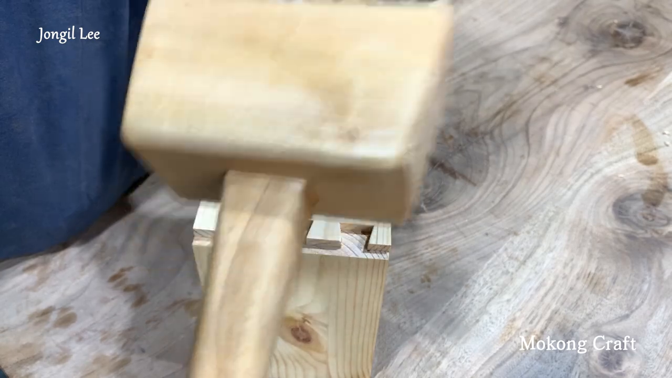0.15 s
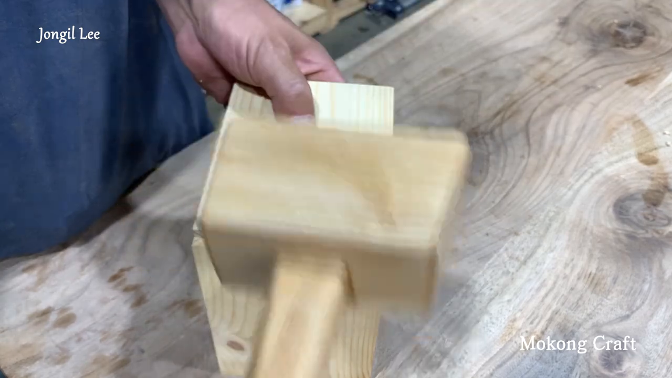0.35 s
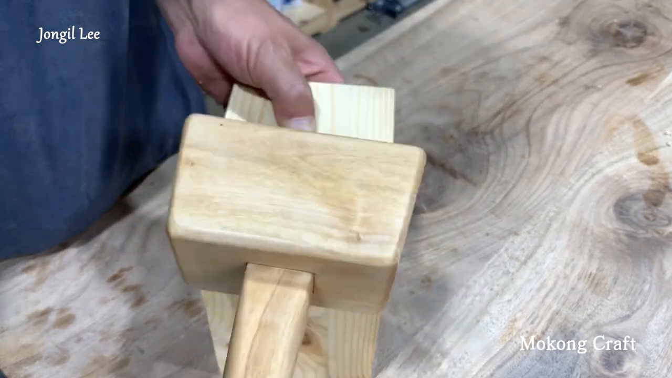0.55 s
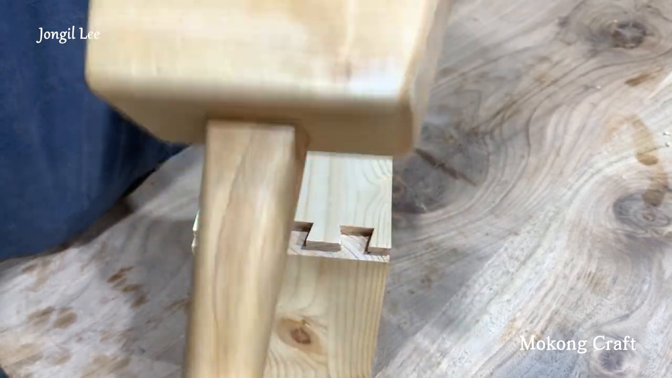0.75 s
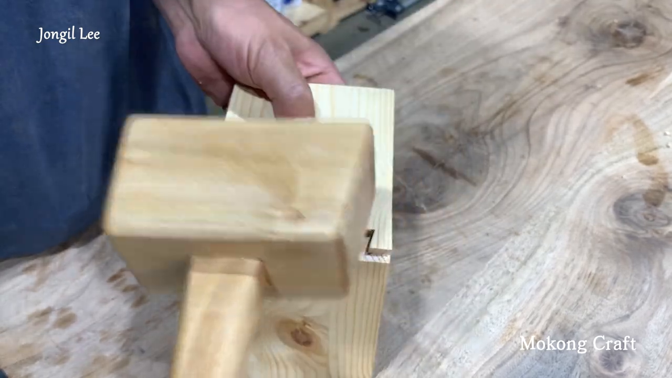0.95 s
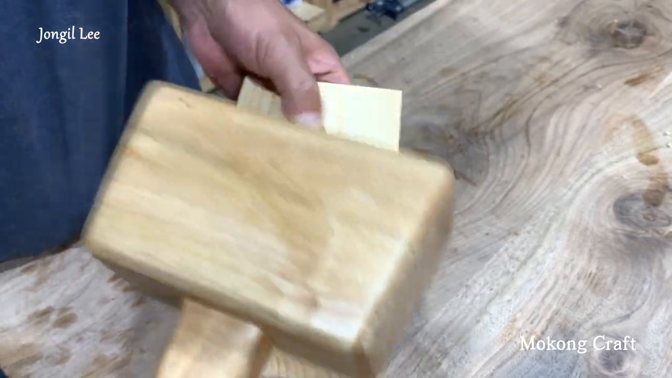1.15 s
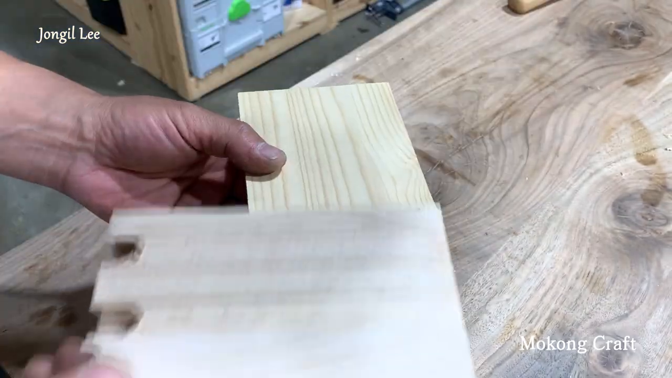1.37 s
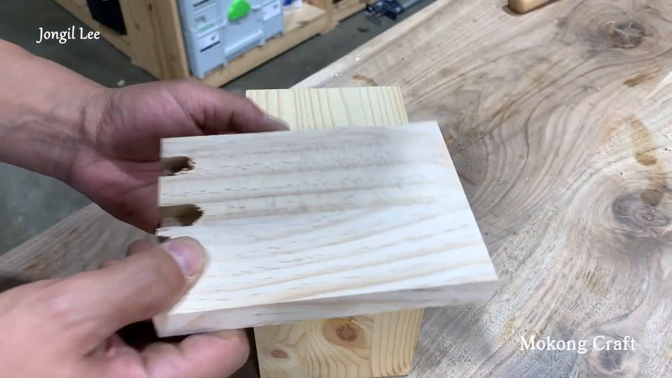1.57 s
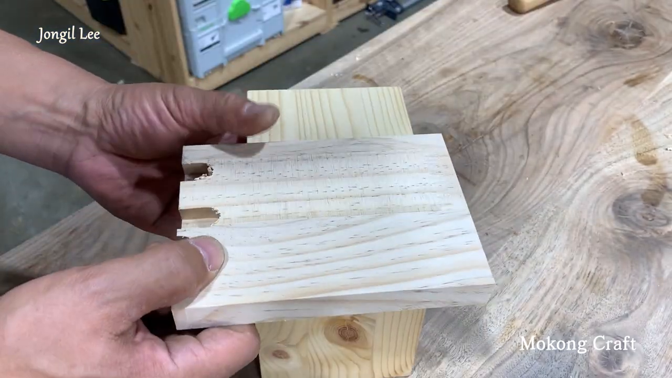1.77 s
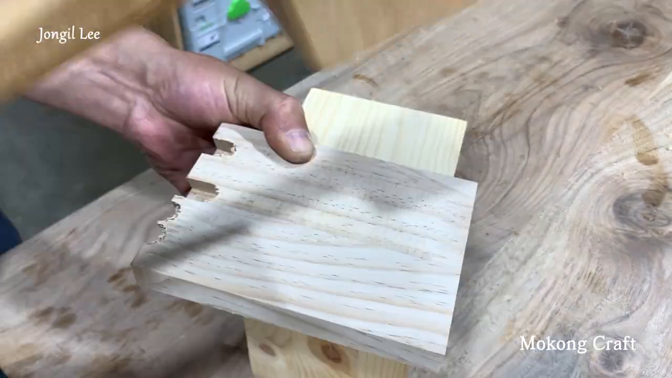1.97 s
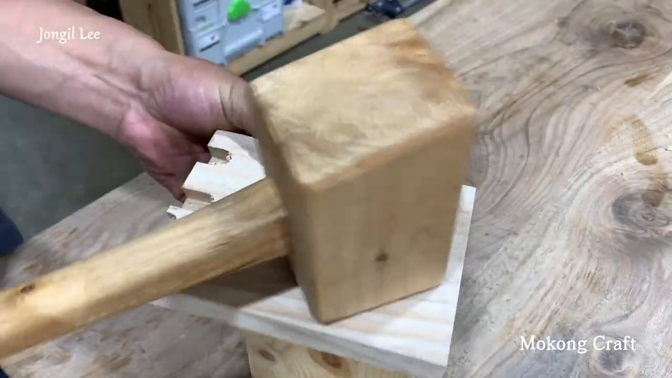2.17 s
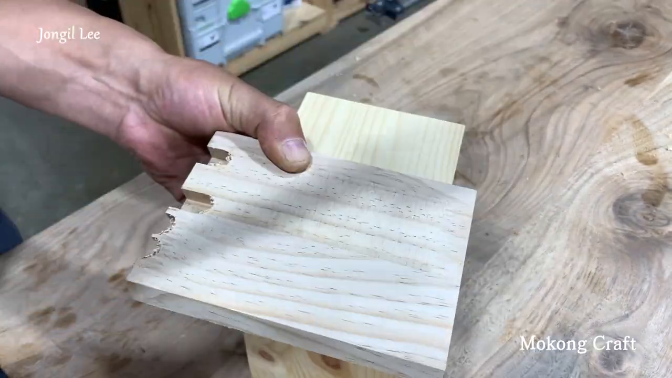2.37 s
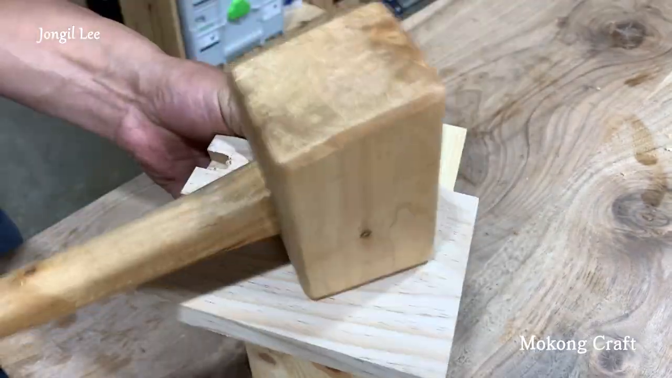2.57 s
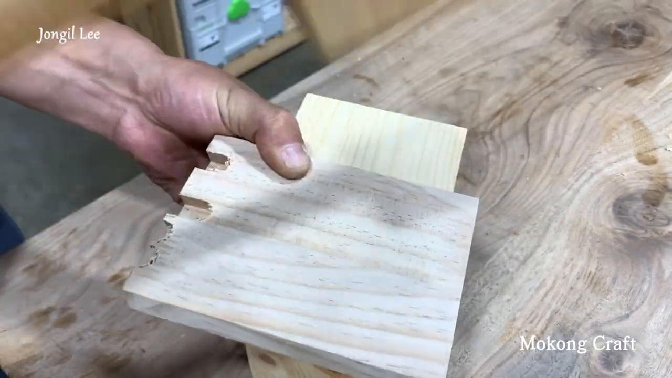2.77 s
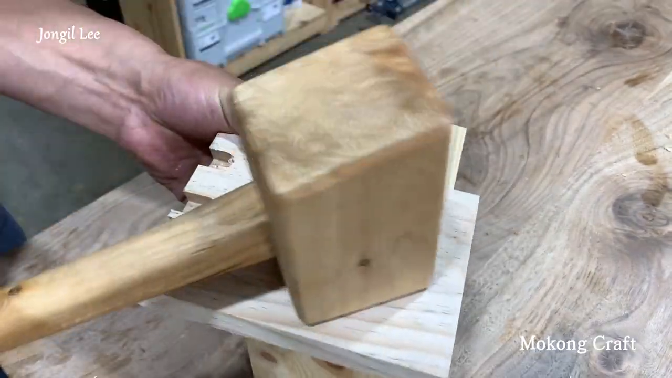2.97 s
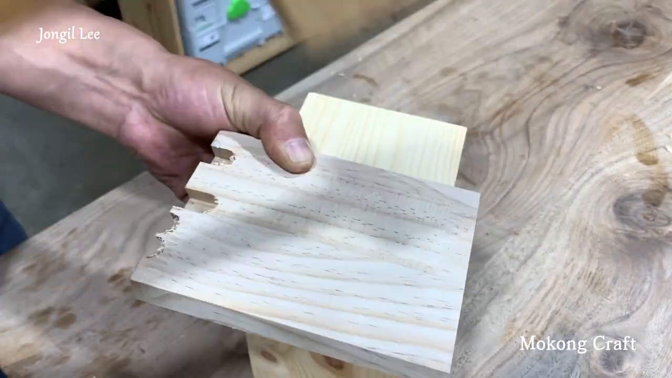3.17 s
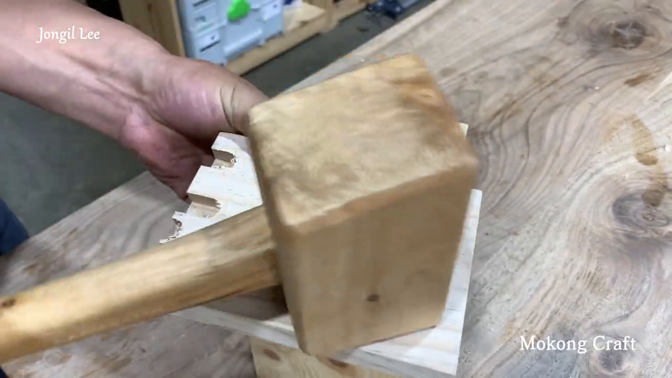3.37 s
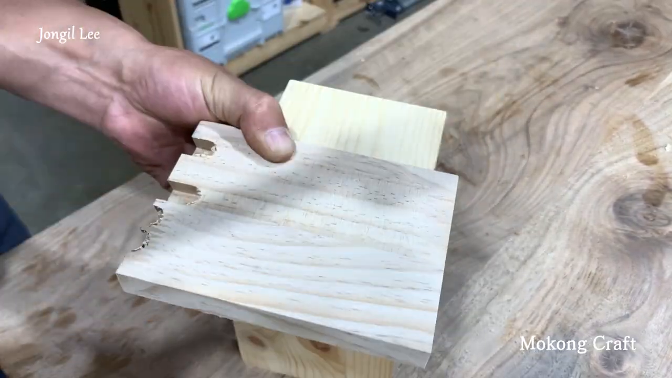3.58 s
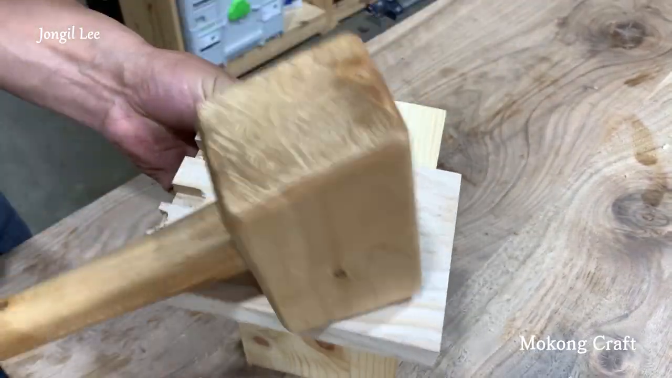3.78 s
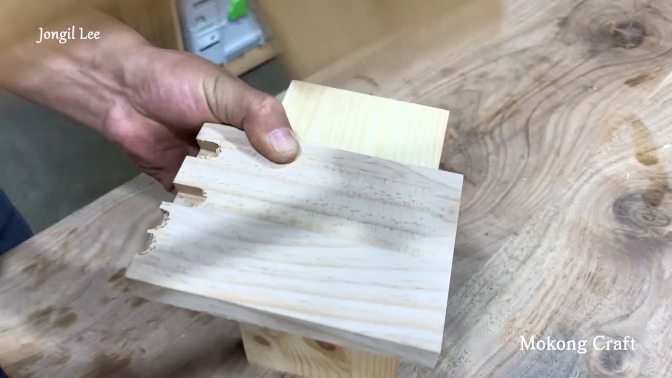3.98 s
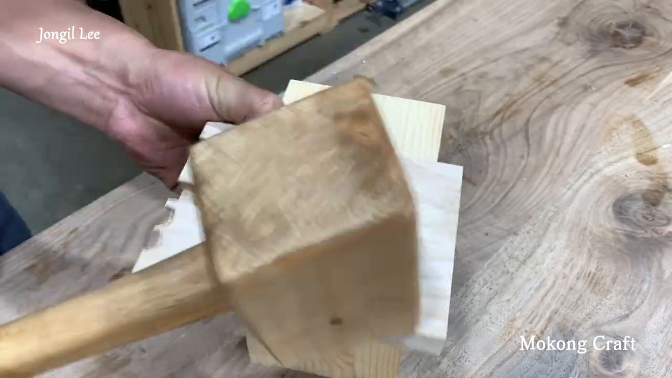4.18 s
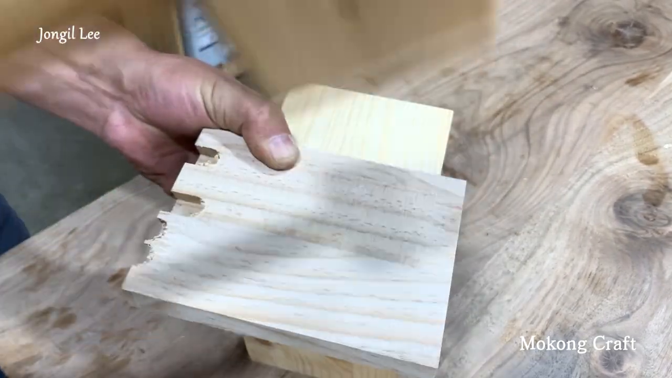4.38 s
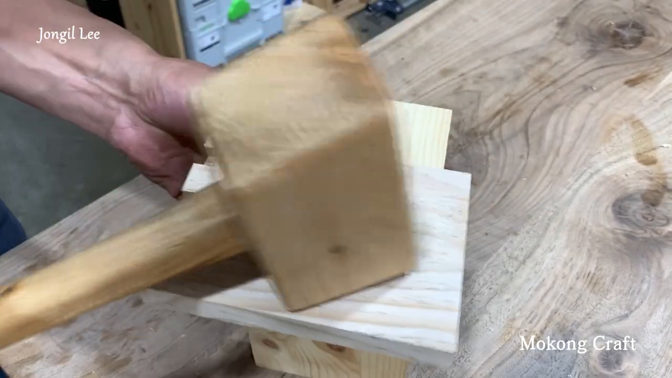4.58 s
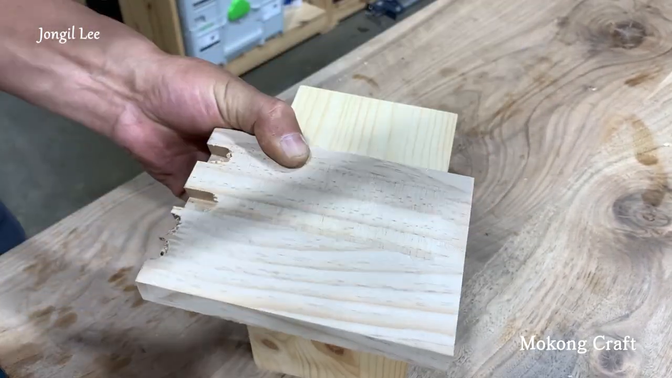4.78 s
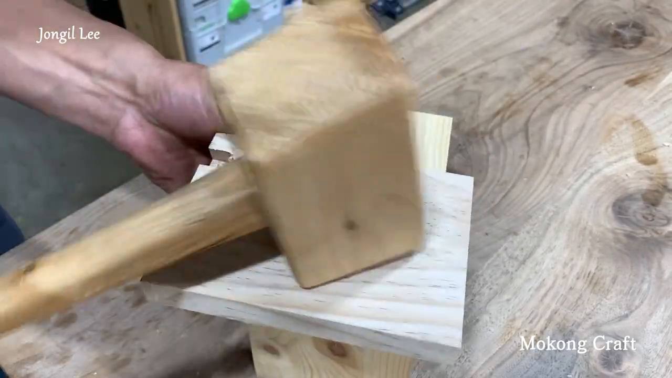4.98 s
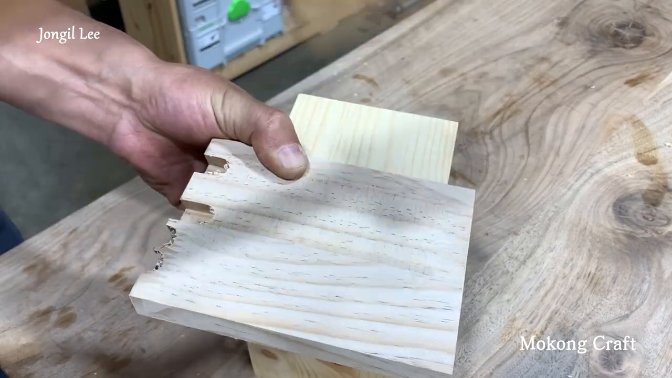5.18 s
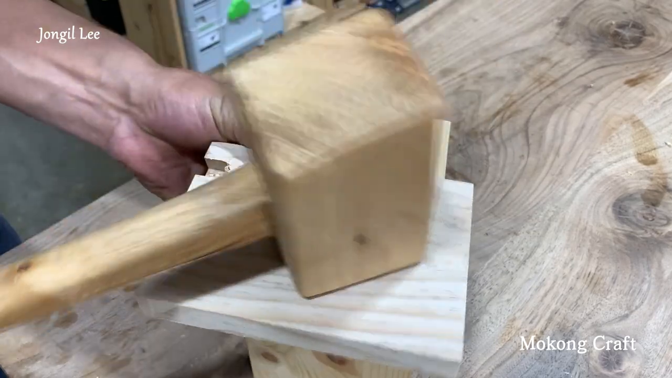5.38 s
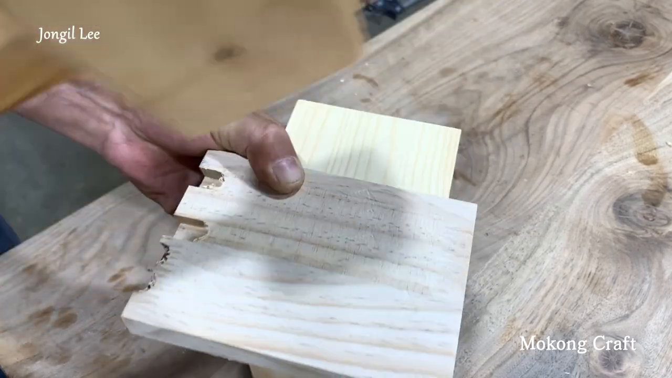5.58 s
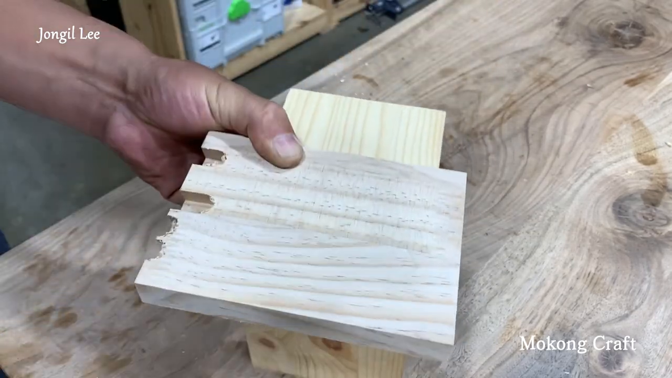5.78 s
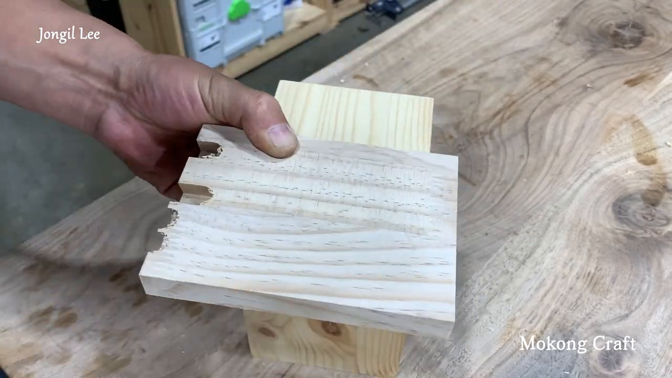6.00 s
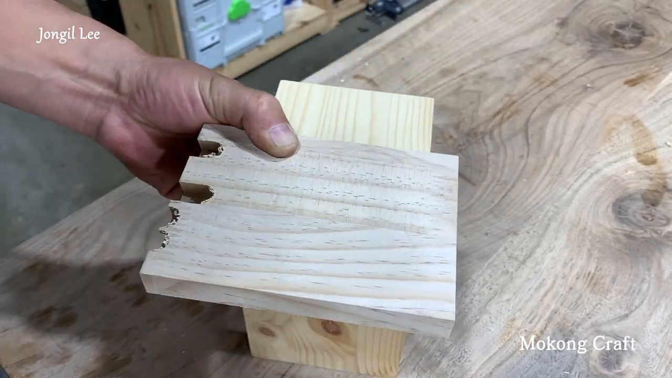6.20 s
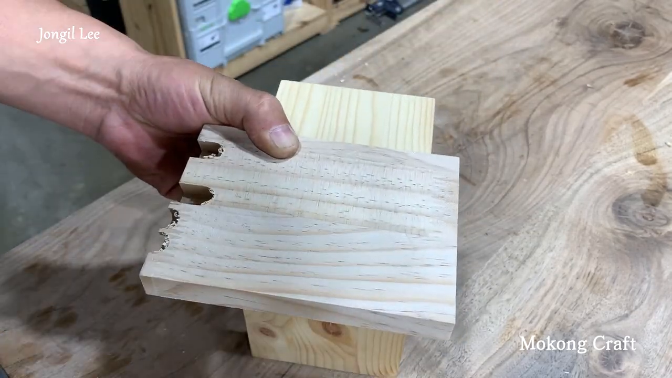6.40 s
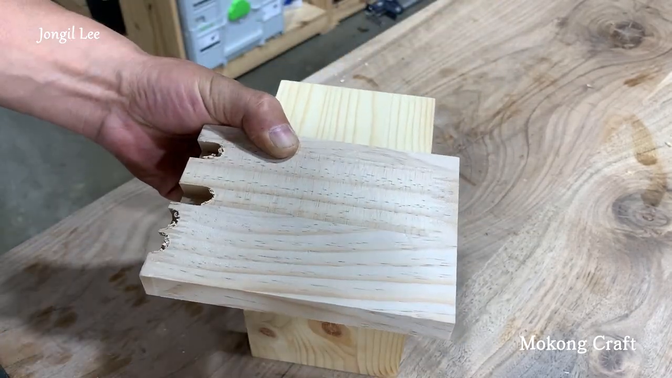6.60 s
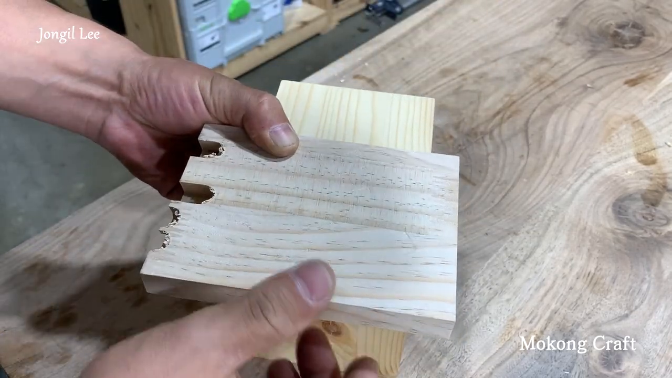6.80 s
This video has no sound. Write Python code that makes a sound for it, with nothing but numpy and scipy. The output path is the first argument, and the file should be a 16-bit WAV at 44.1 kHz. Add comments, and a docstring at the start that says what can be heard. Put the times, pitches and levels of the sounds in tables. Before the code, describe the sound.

A mallet cracks against wood in steady, echoing blows, cut by abrupt pauses, with a board clatter and a soft final set-down on the bench.

```python
"""You first hear hard wooden knocks: a mallet drives a jointed box together on a bench in a large, hard workshop.
Each blow is a short crack of noise, a dull thump off the nearest wall and a long, fading noise from the room.
A loose board is laid on, more blows land, and at the end the mallet is put down; both ring as sums of fading tones.
At two moments the ringing stops dead. Faint puffs of noise, rumbling boards and a hiss of still air lie behind."""
import sys
import numpy as np
from scipy import signal
from scipy.fft import rfft, irfft, next_fast_len
from scipy.io import wavfile
from scipy.ndimage import uniform_filter1d

SR = 44100
rng = np.random.default_rng(int(sys.argv[2]) if len(sys.argv) > 2 else 0)


def log_audio(samples):
    """Write samples as a 16-bit WAV file to the path given in sys.argv[1]."""
    # one column per channel
    frames = np.atleast_2d(samples).T
    # limit to full scale, then quantise
    limited = np.clip(frames, -1, 1)
    pcm = np.round(limited * 32767).astype(np.int16)
    wavfile.write(sys.argv[1], SR, pcm)


N = 302066  # length in samples
T = np.arange(round(1.4 * SR)) / SR  # time within one contact, s


# Mallet blows: t/s, crack level/dB, room answer level/dB, brightness above 1.2 kHz/(dB per octave),
# solidity/(0-1), tilt of the bench towards its low notes/(dB per octave),
# lower contact note f/Hz, upper contact note f/Hz, lift of both notes/dB
BLOWS = [(-.025, -6.5, -19.5, -4.5, 1, -5.5, 3000, 6650, 1.4),
         (0.2554, -6, -19.5, -2.5, 0.76, 1.5, 3000, 6380, 3),
         (0.5368, -3.5, -19.5, -4, 0.87, -7.5, 3000, 6760, 0.5),
         (0.8362, -4.5, -20, -2.5, 0.85, -9, 2900, 6300, 2),
         (2.1143, -7.5, -19.5, -1, 0.37, -2, 3100, 5280, 2.5),
         (2.5306, -7.5, -17, -0.8, 0.14, -7, 4230, 6340, 7),
         (2.909, -6, -15.5, 1.3, 0.15, -0.5, 4170, 5580, 6.8),
         (3.2935, -5.5, -12, 1, 0.06, 7, 4540, 7740, 9.6),
         (3.7697, -6, -15, 0.73, 0.42, -2.5, 4070, 5400, 4),
         (4.1633, -6, -16, -0.23, 0.67, -1, 3300, 6640, 6.8),
         (4.566, -10, -18.5, -1.56, .8, -4, 4210, 5160, 6.7),
         (4.9576, -8, -18, 0.94, 0.87, -5.5, 3700, 5500, 6.5),
         (5.3344, -8, -19, 0.1, 1, -6, 3880, 5050, 7.7)]


def mallet():
    """Each blow has a solidity: higher values bring the room level up faster and make the thump louder."""
    quick_rise, slow_rise = 0.0092, 0.071  # s, rise of the room level at solidity 1 and 0
    soft_warm_db, soft_thump_db = 4, -22.5  # added in full at solidity 0
    out = np.zeros(N)
    shared = rng.standard_normal(len(T))
    for s, crack_db, room_db, bright_db, solid, deep_db, low_hz, high_hz, note_db in BLOWS:
        softness = 1 - np.clip(solid, 0, 1)
        on_box = s < STOPS[-1]
        # warmth is in dB per octave below 1.2 kHz; early is the share of board ring before the walls answer
        if on_box:
            warm_db, bench_db, thump_db, early = 0.8, -19, -7.5, 1
        else:  # struck through the loose board
            warm_db, bench_db, thump_db, early = -3, -21, -16.5, 0.24
        warm_db = warm_db + soft_warm_db * softness
        thump_db = thump_db + soft_thump_db * softness
        rise = quick_rise * (slow_rise / quick_rise) ** softness
        notes = [(low_hz, 0.3 * low_hz, note_db), (high_hz, 0.2 * high_hz, note_db)]

        sharp = amp(crack_db) * crack(lambda hz: lift(hz, notes), 0.012)
        colour = lambda hz: slope(hz, bright_db, warm_db) + lift(hz, notes)
        reply = amp(room_db) * answer(colour, shared)
        # the wood itself keeps only its lower modes
        board = filtered(reply, lambda hz: 1 / (1 + (hz / 1800) ** 4))
        board = board * swell(0, 0.00095) * amp(-60 * T / 0.17)
        room = swell(0.011, rise) * reply + early * board
        low = amp(bench_db) * bench(deep_db) * swell(0.0074, 0.041)
        low = low + amp(thump_db) * thump(0.0145, 320)
        add(out, s, sharp + walls(sharp, on_box) + room + low)
    return out


# Colour of the splintery contact noise: f/Hz, level/dB
CRACK_COLOUR = [(120, -9.5), (200, -29.5), (1520, 3.5), (3560, -2.5), (4130, -3.5), (4790, -14), (5350, -8),
                (8650, -13.5), (12700, -22.5), (16500, -35)]


def crack(contact_db, t60):
    """The contact itself: bright splinter noise that holds for a few ms, then stops fast."""
    colour = lambda hz: amp(along(CRACK_COLOUR, hz) + contact_db(hz))
    splinter = unit(filtered(rng.standard_normal(len(T)), colour))
    return splinter * swell(0, 0.001) * amp(-60 * (T / t60) ** 1.454)


def thump(delay, hz):
    """The blow's low push comes back from the nearest wall as about two dull cycles."""
    t = np.clip(T - delay, 0, None)
    push = np.sin(2 * np.pi * hz * t) + 0.35 * np.sin(2 * np.pi * hz / 3 * t)
    return push * amp(-60 * (t / 0.015) ** 3)


# Single echoes of the crack: t/s after it, level/dB on the box, level/dB through the loose board
WALL_ECHOES = [(.024, -21, -12), (0.033, -11.5, -13.5), (0.048, -16, -26), (0.074, -39, -17.5),
               (0.101, -33, -13), (.275, -34, -25)]


def walls(sharp, on_box):
    """Flat walls return the crack as separate, slightly duller slaps of varying strength."""
    taps = np.zeros(len(T))
    for delay, box_db, board_db in WALL_ECHOES:
        echo_db = box_db if on_box else board_db
        taps[round(delay * SR)] = amp(echo_db + rng.normal(0, 2))
    slaps = signal.fftconvolve(sharp, taps)[:len(T)]
    return filtered(slaps, lambda hz: 1 / (1 + (hz / 4000) ** 2))


# Basic colour of the room's answer: f/Hz, level/dB
ANSWER_COLOUR = [(24, -60), (40, -37), (124, -6), (406, -2.5), (497, -4), (802, -5.5), (910, -8),
                 (1470, -9.5), (1670, -9.5), (4130, -23), (12200, -28), (15300, -35), (16500, -67)]
# Resonances of board and box, before each blow varies them: f/Hz, width/Hz, lift/dB
BOARD_RESONANCES = [(542, 20, 10.5), (811, 12, 11), (1036, 12, 7.5), (1274, 18, 12), (1353, 14, 7),
                    (1496, 18, 10), (1732, 53, 3.5), (2260, 31, 6.5), (3055, 68, -2.5)]


def answer(contact_db, shared):
    """The room returns the contact's colour and, while they last, the board's modes at new strengths."""
    strengths = rng.uniform(0.4, 1.6, len(BOARD_RESONANCES))
    struck = [(c, w, db * k) for (c, w, db), k in zip(BOARD_RESONANCES, strengths)]
    plain = dying(lambda hz: along(ANSWER_COLOUR, hz) + contact_db(hz), shared)
    modes = filtered(plain, lambda hz: amp(lift(hz, struck)) - 1)
    return plain + amp(-60 * T / 0.97) * modes


# Time each band of the room takes to fall by 60 dB: f/Hz, t60/s
ROOM_DECAY = [(60, 0.76), (200, 0.59), (600, 0.45), (900, 0.73), (1200, 1.123), (1700, 1.1), (3000, 1.04),
              (6000, 0.83), (10000, 0.54), (15000, 0.33)]


def dying(colour_db, shared):
    """Room echoes as partly repeated, patchy noise, each band dying at the room's own speed."""
    echoes = 0.61 * shared + rng.standard_normal(len(T))
    echoes = unit(filtered(echoes, lambda hz: amp(colour_db(hz))))
    hz, t, z = signal.stft(echoes, SR, nperseg=256)
    patches = uniform_filter1d(rng.standard_normal(z.shape), size=3, axis=0)
    patches = uniform_filter1d(patches, size=8, axis=1)
    # random level offset for each narrow band, drawn anew for every contact
    offsets = rng.standard_normal((len(hz), 1))
    gain_db = 1.31 * unit(patches) + 1.6 * offsets - 60 * t / along(ROOM_DECAY, hz)[:, None]
    return signal.istft(z * amp(gain_db), SR, nperseg=256)[1][:len(T)]


# Low notes of bench and hollow box, before each blow varies them: f/Hz, level/dB, t60/s
BENCH_NOTES = [(51, -38.5, 1.2), (100.6, -5.5, 0.59), (130.9, 2, 0.46), (169.5, 3.5, 0.25),
               (229.3, -4.5, 0.36), (300.6, -8.5, 0.39)]


def bench(deep_db):
    """Bench and hollow box ring as fading low sine tones, at new strengths each time."""
    total = np.zeros(len(T))
    for hz, db, t60 in BENCH_NOTES:
        db = db + rng.normal(0, 1.5) - deep_db * np.log2(hz / 131)
        phase = rng.uniform(0, 2 * np.pi)
        total += amp(db - 60 * T / t60) * np.sin(2 * np.pi * hz * T + phase)
    return total


# The loose board lands and rocks: t/s, level/dB, room answer level/dB, brightness/(dB per octave)
BOARD_LANDINGS = [(1.646, -4, -43.5, 1.5), (1.682, -18, -46.5, -13), (1.696, -21, -45.5, -18),
                  (1.712, -23.5, -46, -16.5)]
# Notes of the loose board: f/Hz, level/dB, t60/s
BOARD_NOTES = [(169.7, -12.5, 0.29), (249, -15, 0.22), (378, -17, 0.03), (475, -12.5, 0.042),
               (677, -11, 0.022), (792, -6, 0.014), (1055, -5.5, 0.016), (1420, -6, 0.013),
               (1810, 1.5, 0.015), (2300, -17.5, .015), (3400, -4, 0.009), (4100, -6.5, 0.009),
               (5700, -18, 0.0083)]


def loose_board():
    """A loose board lands and rocks, sounding its own fading notes."""
    return knocks(BOARD_LANDINGS, BOARD_NOTES, click_db=-14, low_db=15, spread=0.09, chatter=0.007)


# The mallet touches the bench: t/s, level/dB, room answer level/dB, brightness/(dB per octave)
MALLET_TOUCHES = [(6.124, -32, -41.5, -9), (6.130, -19.5, -40.5, -5), (6.243, -25, -43.5, -5.5),
                  (6.542, -22.5, -42, -4.5), (6.551, -24.5, -44, -7.5), (6.613, -30.5, -55, -11.5)]
# Notes of the mallet head on the bench: f/Hz, level/dB, t60/s
HEAD_NOTES = [(136.5, -2.5, 0.55), (224.7, 4.5, 0.076), (334, -22, 0.086), (533, -17, 0.025),
              (807, 11, 0.0092), (1020, -1, 0.024), (1230, 5.5, 0.021), (1520, 6.5, 0.0089),
              (2180, -2, 0.039), (2550, -6, 0.048), (4800, -16, 0.017), (5130, -10.5, 0.012),
              (6840, -37.5, .02)]


def mallet_put_down():
    """The mallet is set on the bench in several touches that ring head and bench."""
    return knocks(MALLET_TOUCHES, HEAD_NOTES, click_db=-7.5, low_db=2.5, spread=0.49, chatter=0.048)


def knocks(events, modes, click_db, low_db, spread, chatter):
    """Gentle contacts: chatter drives the upper notes, low ones swell softly, the room returns their colour."""
    # low_db: low notes against the room answer; spread: note width as a share of f; chatter: t60 in s
    out = np.zeros(N)
    shared = rng.standard_normal(len(T))
    low = [m for m in modes if m[0] < 300]
    upper = [m for m in modes if m[0] >= 300]
    hum = ringing(low, lambda hz: 0) * swell(0, 0.011)
    bass_cut = signal.butter(N=2, Wn=150 / (SR / 2), btype="high", output="sos")
    # soft wood radiates neither deep bass nor air
    edges = lambda f: 1 / (1 + (100 / (f + 1)) ** 8) / (1 + (f / 5500) ** 6)
    peak = lambda f, hz, db: amp(2 * db) / (1 + ((f - hz) / (spread * hz)) ** 2) ** 2
    power = lambda f: edges(f) * sum(peak(f, hz, db) for hz, db, t60 in modes)
    for s, db, room_db, bright_db in events:
        level = lambda f: bright_db * np.log2(np.clip(f, 400, None) / 1200)
        drive = rng.standard_normal(1500) * amp(-60 * T[:1500] / chatter)
        ring = signal.fftconvolve(ringing(upper, level) * swell(0, 0.00043), drive)[:len(T)]
        ring = signal.sosfilt(bass_cut, ring)
        click = amp(click_db) * crack(lambda f: level(f) - 10 * np.log10(1 + (f / 7000) ** 4), 0.011)
        near = amp(db) * (ring / np.abs(ring).max() + click)
        near = near + amp(room_db + low_db) * hum / np.abs(hum).max()
        room = dying(lambda f: level(f) + 10 * np.log10(power(f)), shared)
        add(out, s, near + amp(room_db) * swell(0.0011, 0.0025) * room)
    return out


def ringing(modes, level):
    """Struck wood as a sum of sine tones, each fading at its own speed."""
    return sum(amp(db + level(hz) - 60 * T / t60) * np.sin(2 * np.pi * hz * T) for hz, db, t60 in modes)


# Faint short puffs of noise, two of them just before a blow: t/s, level/dB, centre f/Hz
PUFFS = [(1.923, -60.5, 7000), (2.093, -29.5, 2500), (2.104, -30.5, 2510), (5.79, -53, 300)]


def puffs():
    """Each puff is short noise round one pitch."""
    out = np.zeros(N)
    for s, db, hz in PUFFS:
        colour = [(hz / 8, -40), (hz / 3, -6), (hz, 0), (hz * 3, -16), (hz * 7, -45)]
        puff = noise(colour, count=2000)
        add(out, s, amp(db) * puff * amp(-60 * T[:len(puff)] / 0.037))
    return out


# Loudness of boards being handled: t/s, level/dB
RUMBLE_LEVEL = [(1.2, -68), (1.37, -46), (1.558, -58.5), (1.706, -35), (1.906, -59), (2.1, -48.5),
                (2.3, -54.5), (5.75, -65), (5.85, -68), (6.2, -69)]
# Colour of that rumble: f/Hz, level/dB
RUMBLE_SPECTRUM = [(15, -27), (25, -11.5), (59, -4), (92, -17.5), (130, -6.5), (218, -11), (360, -24.5),
                   (1800, -35), (2340, -52.5), (3960, -120)]


def handling():
    """Boards shifted on the bench rumble: low noise whose level wanders in lumps."""
    wander = unit(uniform_filter1d(rng.standard_normal(N), size=1500))
    lumps = amp(3.0 * wander)
    return curve(RUMBLE_LEVEL) * unit(lumps * noise(RUMBLE_SPECTRUM, N))


# Loudness of the still air, highest between the two stops: t/s, level/dB
AIR_LEVEL = [(1.2, -102), (1.26, -61), (1.99, -60), (2.02, -64.5), (2.3, -79), (6.4, -73.5), (6.85, -90)]
# Colour of the air's hiss: f/Hz, level/dB
HISS_COLOUR = [(300, -11), (500, 1), (3000, -1), (6000, -15.5), (9000, -22), (15000, -47)]


def still_air():
    """The still air of the shop is faint coloured noise that follows a level curve."""
    return curve(AIR_LEVEL) * noise(HISS_COLOUR, N)


# Moments when knocks and puffs still sounding stop dead: t/s
STOPS = (1.256, 2.006)


def add(track, s, sound):
    """Mixes a sound in at s seconds; the next stop silences it."""
    start = round(s * SR)
    stops = [round(stop * SR) for stop in STOPS if stop > s]
    end = min(stops + [N, start + len(sound)])
    # a sound that starts before time 0 loses its beginning
    track[max(start, 0):end] += sound[max(-start, 0):end - start]


def swell(delay, rise):
    """A level that is 0 until the delay, then climbs smoothly towards 1 (both in s)."""
    return 1 - np.exp(-np.clip(T - delay, 0, None) / max(rise, 1e-4))


def slope(hz, bright_db, warm_db):
    """Colour in dB that turns about 1.2 kHz."""
    octaves = np.log2(np.clip(hz, 150, None) / 1200)
    return np.where(octaves > 0, bright_db, -warm_db) * octaves


def lift(hz, peaks):
    """dB added round each (f/Hz, width/Hz, lift/dB) resonance."""
    return sum(db / (1 + (2 * (hz - c) / w) ** 2) for c, w, db in peaks)


def amp(db):
    """Turns dB into a plain gain."""
    return 10 ** (np.asarray(db) / 20)


def unit(x):
    """Scales a signal to an rms of 1."""
    return x / np.sqrt(np.mean(x ** 2) + 1e-20)


def along(points, hz):
    """Reads a (f/Hz, value) table at any frequency, on a log axis."""
    f, v = np.transpose(points)
    return np.interp(np.log(hz + 1), np.log(f + 1), v)


def curve(rows):
    """Gain per sample from a (t/s, level/dB) table, practically silent outside it."""
    s, db = np.transpose(rows)
    return amp(np.interp(np.arange(N) / SR, s, db, -150, -150))


def filtered(x, response):
    """Multiplies the spectrum of x by a response of frequency."""
    m = next_fast_len(len(x) + 8192)  # room for the filter's tail
    return irfft(rfft(x, m) * response(np.fft.rfftfreq(m, 1 / SR)), m)[:len(x)]


def noise(spectrum, count):
    """Coloured noise of rms 1."""
    return unit(filtered(rng.standard_normal(count), lambda hz: amp(along(spectrum, hz))))


def scene():
    """Everything in the shop, as one channel."""
    knocking = mallet() + loose_board() + mallet_put_down()
    return (knocking + puffs() + handling() + still_air())[None]


def record(dry):
    """Tall peaks are rounded, deep bass is weakened and nothing sounds above 16.8 kHz."""
    top_hz, bass_hz = 16800, 45
    soft = dry[0] / (1 + np.abs(dry[0] / 0.68) ** 4) ** (1 / 4)
    return filtered(soft, lambda hz: (hz < top_hz) / np.sqrt(1 + (bass_hz / (hz + 1)) ** 4))[None]


dry = scene()
out = record(dry)
log_audio(out)
```